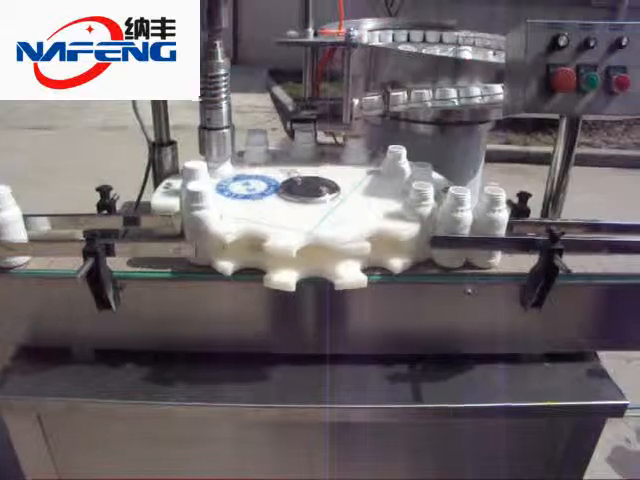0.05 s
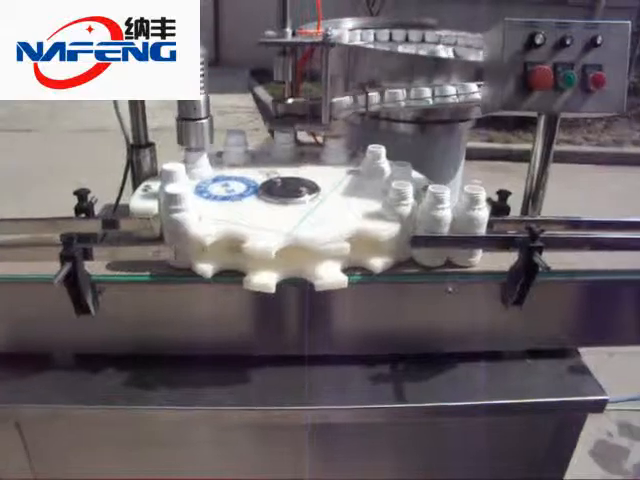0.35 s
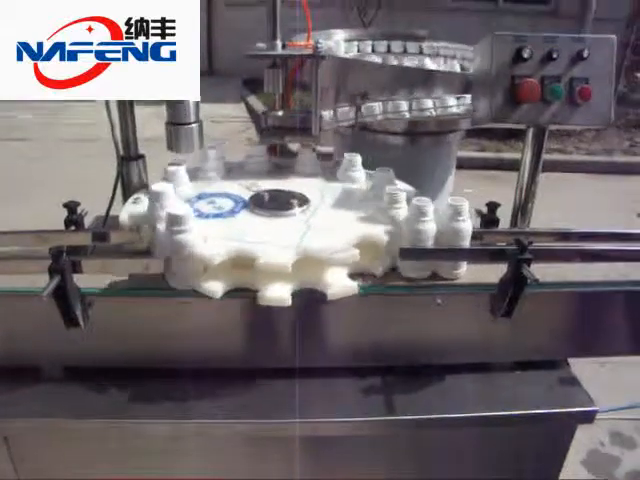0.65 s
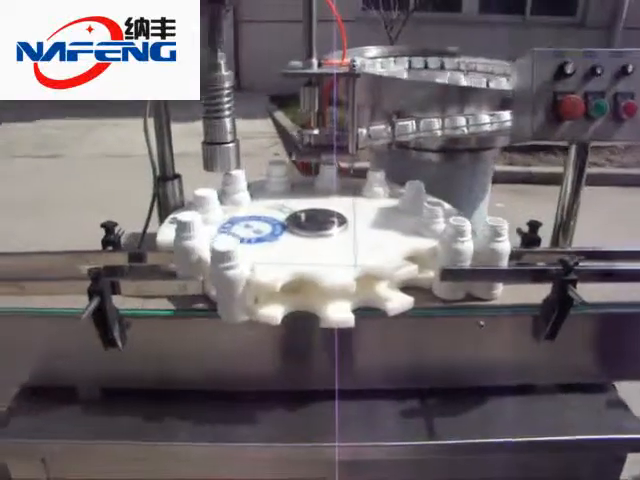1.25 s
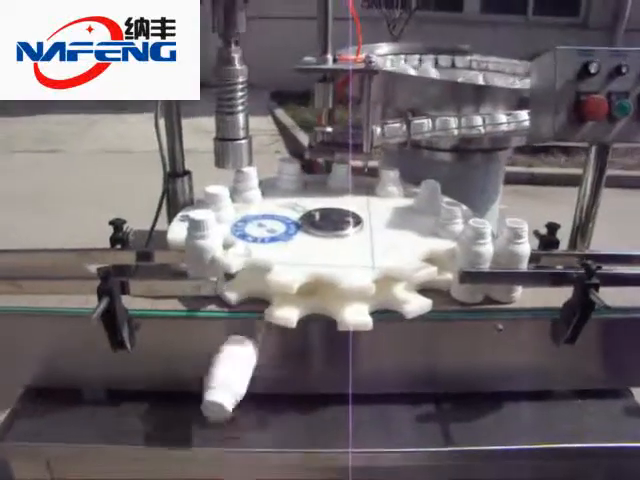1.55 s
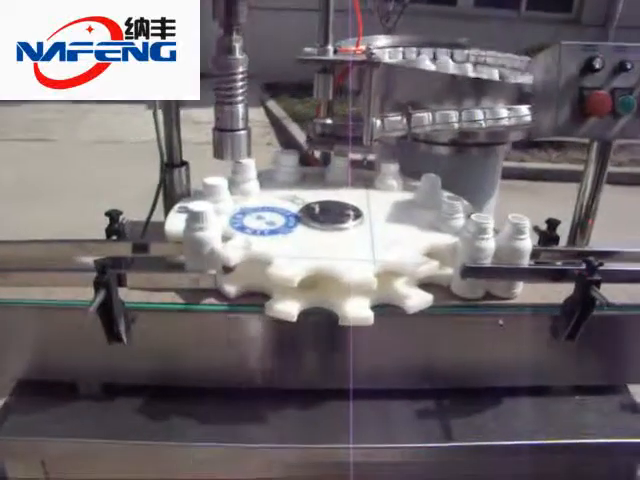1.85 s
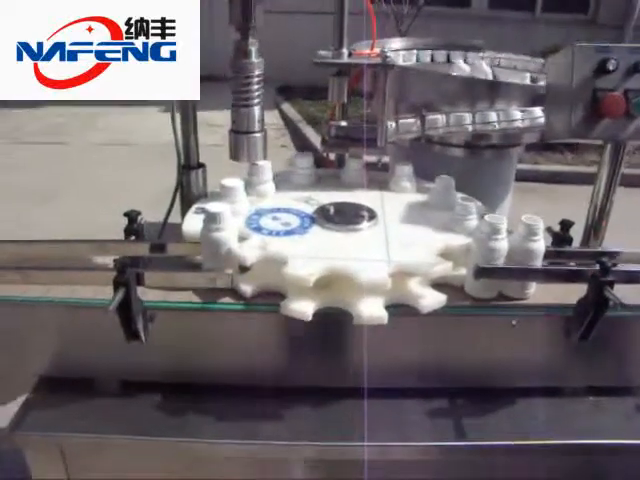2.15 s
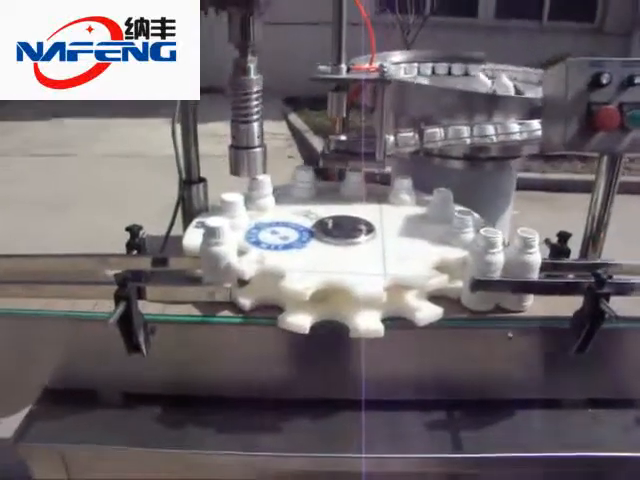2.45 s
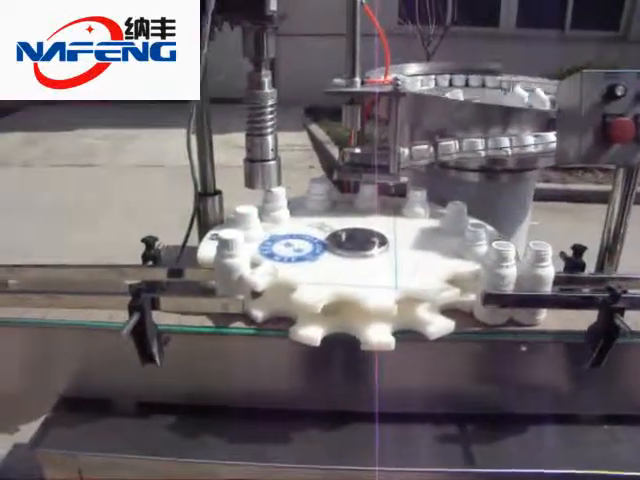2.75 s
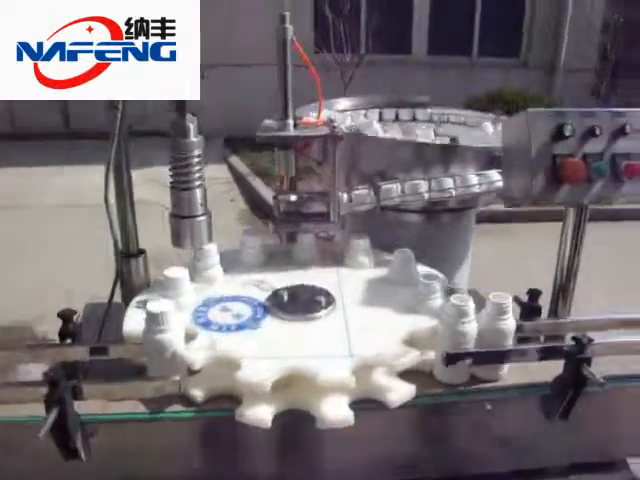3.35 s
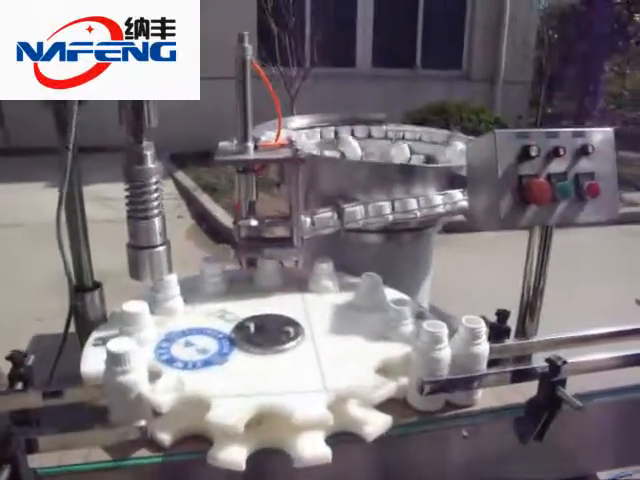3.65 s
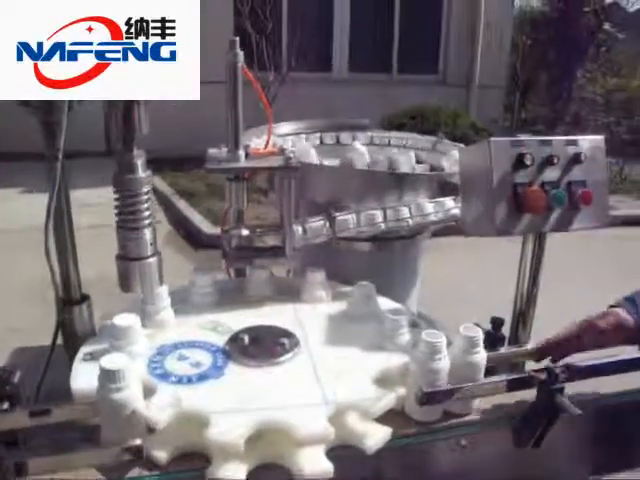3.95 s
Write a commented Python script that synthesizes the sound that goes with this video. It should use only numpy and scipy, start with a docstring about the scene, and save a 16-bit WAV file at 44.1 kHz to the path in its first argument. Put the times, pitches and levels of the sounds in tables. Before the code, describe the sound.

Plastic caps rattle in a running capping machine's ringing steel bowl, amid knocks and clacks.

```python
"""Bottle capping machine in a yard

A vibrating bowl shakes plastic caps at 50 Hz; they rattle and keep the steel ringing over the drive's whir.
Air vents with a burst, bottles knock round the star wheel, metal parts clack and the indexing drive thuds.
Late on, gusts hit the microphone of a narrow-band recorder that overloads on the peaks."""
import sys
import numpy as np
from scipy import signal
from scipy.fft import rfft, irfft
from scipy.io import wavfile
from scipy.ndimage import uniform_filter1d

SR = 44100
rng = np.random.default_rng(int(sys.argv[2]) if len(sys.argv) > 2 else 0)


def waveform_to_disk(signal):
    """Save audio, clipped to [-1, 1], as 16-bit WAV at the path in sys.argv[1]."""
    frames = np.transpose(np.atleast_2d(signal))
    scaled = np.clip(frames, -1, 1) * 32767
    samples = np.round(scaled).astype(np.int16)
    wavfile.write(sys.argv[1], SR, samples)


N = 176400
TIME = np.arange(N) / SR


def from_db(db):
    """Decibels to gain."""
    return 10 ** (np.asarray(db) / 20)


def unit_rms(x):
    """Scale to unit power."""
    return x / np.sqrt(np.mean(x ** 2) + 1e-20)


def envelope(rows):
    """Gain over time from rows of t/s, level/dB."""
    return from_db(np.interp(TIME, *np.transpose(rows)))


def colour(x, spectrum):
    """Shape x by rows of f/Hz, level/dB; unit power."""
    hz, db = np.transpose(spectrum)
    f = np.fft.rfftfreq(N, 1 / SR) + 1
    gain = from_db(np.interp(np.log(f), np.log(hz), db))
    return unit_rms(irfft(rfft(x) * gain, N))


def drift(corner_hz):
    """Slow random motion; unit power."""
    f = np.fft.rfftfreq(N, 1 / SR)
    return unit_rms(irfft(rfft(rng.standard_normal(N)) * (f > 0) / (1 + (f / corner_hz) ** 2), N))


def resonate(x, hz, width_hz):
    """Two-pole resonance driven by x; unit power."""
    r = np.exp(-np.pi * width_hz / SR)
    return unit_rms(signal.lfilter([1, 0, -1], [1, -2 * r * np.cos(2 * np.pi * hz / SR), r * r], x))


def band_noise(samples, band_hz):
    """Band-passed noise; unit power."""
    bandpass = signal.butter(2, band_hz, "band", fs=SR, output="sos")
    return unit_rms(signal.sosfilt(bandpass, rng.standard_normal(samples)))


SHAKE_HZ, SHAKE_PEAK_S = 50, .0038
LANDINGS_PER_S, LANDING_SPREAD_DB = 3600, 2.5


def shake(depth):
    """Swing about 1 at the bowl's shaking rate."""
    return 1 + depth * np.cos(2 * np.pi * SHAKE_HZ * (TIME - SHAKE_PEAK_S))


def landings():
    """Tiny cap impacts, bunched once per shake."""
    hits = rng.random(N) < LANDINGS_PER_S * shake(depth=.46) / SR
    return hits * rng.choice([-1, 1], N) * from_db(LANDING_SPREAD_DB * rng.standard_normal(N))


def held_ring(hz, width_hz):
    """Resonance fed by dense, pulsing impulses, its slow swells evened out."""
    ring = resonate(landings(), hz, width_hz)
    return ring / np.sqrt(uniform_filter1d(ring ** 2, size=3000) + 1e-6)


def blows(rows, modes, crack_db, crack_s, crack_hz):
    """One blow per row: a short noise crack plus decaying modes."""
    out, t = np.zeros(N + SR), TIME[:SR // 2]
    for start_s, db, hz in rows:
        ring = 0
        for ratio, mode_db, t60 in modes:
            decay = from_db(mode_db + rng.normal() - 60 * t / t60)
            ring += decay * np.sin(2 * np.pi * hz * ratio * t)
        crack = band_noise(len(t), crack_hz) * np.exp(-t / crack_s)
        start = int(start_s * SR)
        out[start:start + len(t)] += from_db(db) * (ring + from_db(crack_db) * crack)
    return out[:N]


# Drive and conveyor spectrum: f/Hz, relative level/dB
WHIR_SPECTRUM = [(25, -24), (70, -2), (130, -5.5), (200, 2.5), (300, 0), (400, 7), (600, 3.5), (900, 0),
                 (1500, 5.5), (3000, -27)]
# Frame resonances: f/Hz, width/Hz, level/dB
FRAME_MODES = [(401, 11, -36), (573.7, 22, -33), (835, 18, -33.5)]
# Bowl magnet partials: f/Hz, level/dB
MAGNET_HUM = [(50, -38), (100, -40.5), (150, -44.5), (450, -40.5)]
WHIR_DB, WHIR_FLUTTER_DB = -22, 2


def drive(vigour):
    """The conveyor whirs in the frame, swelling with vigour, over the magnet's steady hum."""
    whir_gain = from_db(WHIR_DB + WHIR_FLUTTER_DB * drift(45))
    whir = whir_gain * colour(rng.standard_normal(N), WHIR_SPECTRUM)
    frame = sum(from_db(db) * resonate(rng.standard_normal(N), hz, width)
                for hz, width, db in FRAME_MODES)
    hum = sum(from_db(db) * np.sqrt(2) * np.sin(2 * np.pi * (hz * TIME + rng.random()))
              for hz, db in MAGNET_HUM)
    return (whir + frame) * unit_rms(vigour) ** .57 + hum


# Gust peaks: t/s, half length/s, level/dB
WIND_GUSTS = [(2.793, 0.01, -8.5), (2.869, 0.022, -11.5), (3.079, 0.01, -12.5), (3.132, 0.028, -11),
              (3.427, 0.059, -18.5), (3.704, 0.02, -15), (3.771, 0.012, -13.5), (3.872, 0.013, -15.5)]
# Rumble spectrum: f/Hz, relative level/dB
WIND_SPECTRUM = [(20, -4), (75, 0), (150, -2), (220, -5.5), (350, -10.5), (650, -21), (1500, -50)]


def wind():
    """Short gusts rumble on the microphone."""
    power = sum(from_db(db) ** 2 * np.exp(-((TIME - peak_s) / half_s) ** 2)
                for peak_s, half_s, db in WIND_GUSTS)
    return np.sqrt(power) * colour(rng.standard_normal(N), WIND_SPECTRUM)


# Vent whistles: f/Hz
WHISTLE_HZ = [4283, 4404, 4688, 5103, 5390, 5632, 5912, 6330]
# Each whistle in the burst: level/dB
WHISTLE_BURST_DB = [-21, -22, -26, -23, -25, -29, -32, -43]
# Each whistle in steady flow: level/dB
WHISTLE_FLOW_DB = [-38.5, -38.5, -32.5, -39, -36, -40.5, -45, -47]
AIR_START_S, AIR_ATTACK_S, AIR_HOLD_S, AIR_RELEASE_S = .302, .041, .047, .032
PIPE_HZ, PIPE_DB, EXHAUST_S = 2686, -18.5, .43
HISS_DB, FLOW_FLUTTER_DB = -18.5, 3


def air_vent():
    """A burst; the exhaust pipe rings while the cylinder empties; a faint whistling flow remains."""
    age = TIME - AIR_START_S
    opening = np.clip(age / AIR_ATTACK_S, 0, 1)
    burst = np.exp(-np.maximum(age - AIR_ATTACK_S - AIR_HOLD_S, 0) / AIR_RELEASE_S)
    emptying = np.exp(-np.maximum(age - EXHAUST_S, 0) / AIR_RELEASE_S)
    flow = from_db(FLOW_FLUTTER_DB * drift(27))
    whistles = 0
    for hz, burst_db, flow_db in zip(WHISTLE_HZ, WHISTLE_BURST_DB, WHISTLE_FLOW_DB):
        gain = np.maximum(burst * from_db(burst_db), flow * from_db(flow_db))
        whistles += gain * held_ring(hz, width_hz=12)
    hiss = from_db(HISS_DB) * band_noise(N, band_hz=(530, 3100))
    pipe = from_db(PIPE_DB) * held_ring(PIPE_HZ, width_hz=140)
    return opening * (whistles + hiss * burst + pipe * emptying)


# Indexing thuds: t/s, level/dB, f/Hz
INDEXER_HITS = [(.358, -9.5, 213), (.372, -14.5, 210), (1.64, -12.5, 201)]
# Thud modes: frequency ratio, level/dB, t60/s
INDEXER_MODES = [(1, -12.5, 0.21), (1.7, -3.5, 0.076), (2.7, -6, 0.018)]


def indexer_thuds():
    """The indexing drive thuds: a crack over low modes."""
    return blows(INDEXER_HITS, INDEXER_MODES, crack_db=3.5, crack_s=.0087, crack_hz=(450, 2980))


# Bottle bumps: t/s, level/dB, f/Hz
BOTTLE_HITS = [(.635, -10.5, 690), (.757, -6, 690), (.772, -3.5, 692), (.808, -8.5, 689)]
# Bottle mode: frequency ratio, level/dB, t60/s
BOTTLE_MODES = [(1, -3.5, 0.07)]


def bottle_bumps():
    """A loose plastic bottle bumps and sounds one short mode."""
    return blows(BOTTLE_HITS, BOTTLE_MODES, crack_db=-22, crack_s=.0055, crack_hz=(600, 3000))


# Metal clacks: t/s, level/dB, f/Hz
METAL_HITS = [(.353, -3, 2360), (.712, -3, 2260), (1.640, 0.5, 2430), (1.696, 1.5, 2340), (2.129, 8, 2375),
              (2.140, 9, 2332), (2.183, -1, 2380), (2.741, -1, 2465), (3.066, 1, 2150), (3.183, -6, 2360),
              (3.242, -10.5, 2420), (3.295, -0.5, 2370)]
# Clack modes: frequency ratio, level/dB, t60/s
METAL_MODES = [(.42, -21, .03), (.68, -14, .04), (.92, -8, .03), (1, -3, .055), (1.35, -11, .03),
               (1.48, -9, .035)]


def metal_clacks():
    """Metal parts strike and ring briefly."""
    return blows(METAL_HITS, METAL_MODES, crack_db=-4.5, crack_s=.0046, crack_hz=(810, 3760))


# Star wheel knocks: t/s, level/dB, f/Hz
WHEEL_HITS = [(1.2205, 7.5, 1690), (1.254, -10, 1646), (1.702, -2.5, 1630), (2.145, 4.5, 1618),
              (2.806, -7, 1590), (3.0215, 3, 1635), (3.181, -6, 1630), (3.572, 5.5, 1599),
              (3.585, 3.5, 1583)]
# Knock modes: frequency ratio, level/dB, t60/s
WHEEL_MODES = [(0.619, -11.5, 0.028), (.78, -13.5, 0.053), (.95, -7.5, 0.052), (0.999, -7.5, 0.065),
               (1.3, -8, 0.024), (2.2, -19, 0.03)]


def star_wheel_knocks():
    """Bottles knock hollowly round the star wheel."""
    return blows(WHEEL_HITS, WHEEL_MODES, crack_db=-1, crack_s=.003, crack_hz=(850, 2000))


PING_LOW_HZ, PING_HIGH_HZ, PING_DB, PING_T60_S = 2206, 3820, -16.5, .15
PING_CHANCE = .1  # per shake and pitch


def cap_pings():
    """Single caps bounce higher and ping on the track, in time with the shaking."""
    shakes_s = np.arange(0, N / SR - 1 / SHAKE_HZ, 1 / SHAKE_HZ)
    out, r = 0, from_db(-60 / (PING_T60_S * SR))
    for hz in np.geomspace(PING_LOW_HZ, PING_HIGH_HZ, 12):
        clicks, w = np.zeros(N), 2 * np.pi * hz / SR
        delays_s = rng.random(len(shakes_s)) * .5 / SHAKE_HZ
        starts = ((shakes_s + delays_s) * SR).astype(int)
        clicks[starts] = (rng.random(len(shakes_s)) < PING_CHANCE) * from_db(PING_DB)
        out += signal.lfilter([0, np.sin(w)], [1, -2 * r * np.cos(w), r * r], clicks + 1e-18)
    return out


# Main bowl modes: f/Hz, width/Hz
BOWL_MODES = [(2096, 11), (3127, 17), (4165, 6)]
# Envelope of each mode: t/s, level/dB
LOW_MODE_LEVEL = [(0.0, -39), (0.35, -23), (0.53, -21), (0.66, -25), (0.78, -17.5), (1.1, -18.5),
                  (1.158, -31), (1.22, -15.5), (1.39, -14), (1.46, -17.5), (1.84, -19), (2.01, -13),
                  (2.07, -23), (2.21, -6.5), (2.33, -22.5), (2.56, -11.5), (2.75, -23), (2.87, -13.5),
                  (2.97, -30.5), (3.05, -14), (3.26, -27), (3.35, -13.5), (3.49, -15), (3.58, -22),
                  (3.96, -18.5)]
MID_MODE_LEVEL = [(0.0, -38), (0.4, -24.5), (2.0, -25), (2.42, -19), (2.68, -28), (2.8, -18.5),
                  (3.12, -25.5), (3.25, -18.5), (3.351, -22), (3.96, -19.5)]
HIGH_MODE_LEVEL = [(0, -48), (0.74, -29.5), (0.82, -30), (1.1, -23.5), (1.2, -27), (1.62, -34), (1.71, -21),
                   (1.82, -42), (1.9, -21), (2.25, -23), (2.34, -39), (2.48, -27.5), (2.88, -23),
                   (3.1, -35), (3.19, -19), (3.29, -38), (3.38, -19), (3.53, -32), (3.68, -18.5),
                   (3.77, -30), (3.84, -18)]


def bowl_ring():
    """Landing caps keep three steel modes ringing, throbbing with the shake."""
    levels = LOW_MODE_LEVEL, MID_MODE_LEVEL, HIGH_MODE_LEVEL
    ring = sum(held_ring(*mode) * envelope(rows) for mode, rows in zip(BOWL_MODES, levels))
    return ring * shake(depth=.2)


# Cap rattle spectrum: f/Hz, relative level/dB
RATTLE_SPECTRUM = [(300, -22.5), (900, -14), (1500, -12.5), (1900, -6.5), (2200, 0), (2700, -2.5),
                   (3500, -7), (4300, -10), (5000, -15), (5600, -26), (6400, -21.5), (7200, -18.5)]
# Faint bowl modes: f/Hz, width/Hz
BOWL_OVERTONES = [(3376, 40), (3530, 20)]
RATTLE_GAIN_DB, RATTLE_FLUTTER_DB, OVERTONE_DB = 2.59, .5, -35


def bowl_feeder(vigour):
    """Plastic caps rattle and ping in the ringing steel bowl."""
    rattle = colour(landings(), RATTLE_SPECTRUM) * vigour
    rattle *= from_db(RATTLE_GAIN_DB + RATTLE_FLUTTER_DB * drift(26))
    overtones = from_db(OVERTONE_DB) * sum(resonate(landings(), *mode) for mode in BOWL_OVERTONES)
    return rattle + bowl_ring() + (overtones + cap_pings()) * unit_rms(vigour)


# Vigour of the rattle, also followed by the whir: t/s, relative level/dB
VIGOUR_LEVEL = [(0.0, -16.5), (0.3, -17.5), (0.34, -13.5), (0.89, -15), (0.92, -15), (1.78, -14),
                (2.06, -15.5), (2.11, -13.5), (3.17, -14), (3.26, -12), (3.37, -13), (3.96, -11)]


def scene():
    """The running machine, its impacts and the wind; mono."""
    vigour = envelope(VIGOUR_LEVEL)
    impacts = star_wheel_knocks() + metal_clacks() + bottle_bumps() + indexer_thuds()
    return (impacts + bowl_feeder(vigour) + drive(vigour) + air_vent() + wind())[None]


PREAMP_CLIP, OUTPUT_CLIP = .95, .98
RECORDER_EDGE_HZ, CUTOFF_HZ = 6060, 16000
END_S, END_FADE_S = 3.984, .003


def record(dry):
    """The preamp overloads, the recorder narrows the band, peaks clip flat; the sound stops short."""
    overloaded = np.clip(dry, -PREAMP_CLIP, PREAMP_CLIP)
    narrow = signal.sosfilt(signal.butter(18, RECORDER_EDGE_HZ, fs=SR, output="sos"), overloaded)
    clipped = np.clip(narrow, -OUTPUT_CLIP, OUTPUT_CLIP)
    fade = np.clip((END_S - TIME) / END_FADE_S, 0, 1)
    return signal.sosfilt(signal.ellip(10, .1, 70, CUTOFF_HZ, fs=SR, output="sos"), clipped * fade)


dry = scene()
out = record(dry)
waveform_to_disk(out)
```